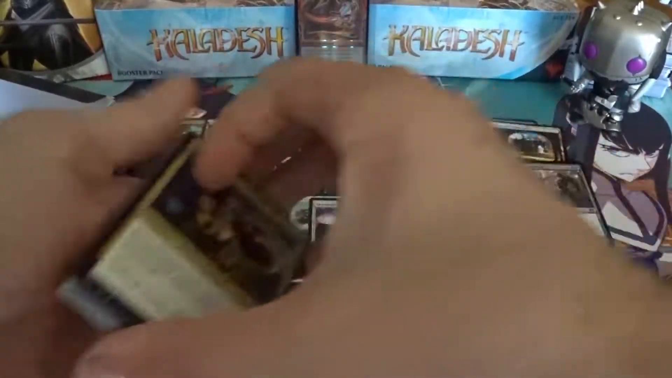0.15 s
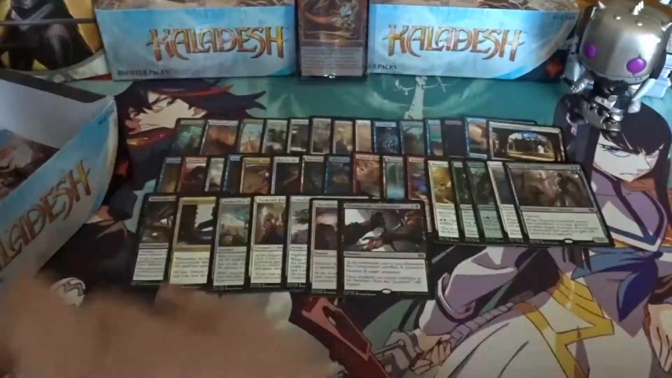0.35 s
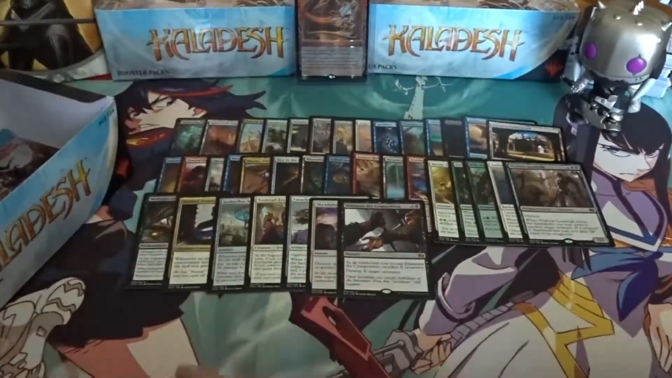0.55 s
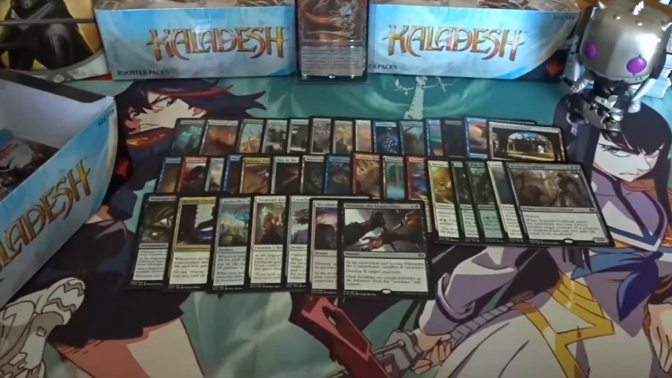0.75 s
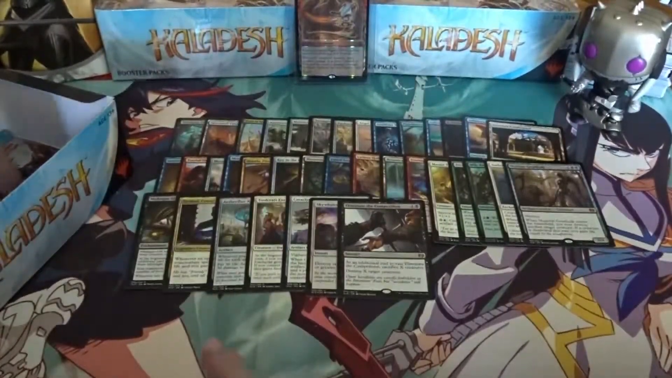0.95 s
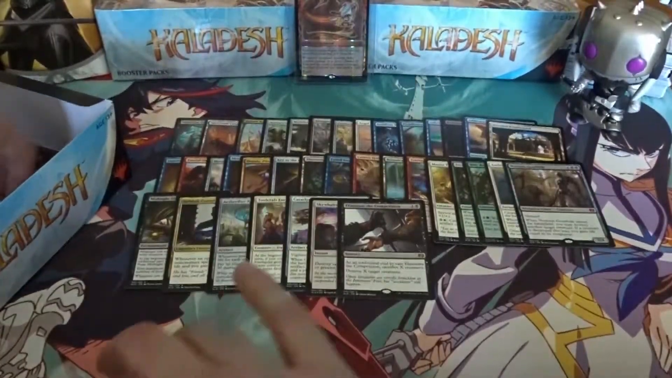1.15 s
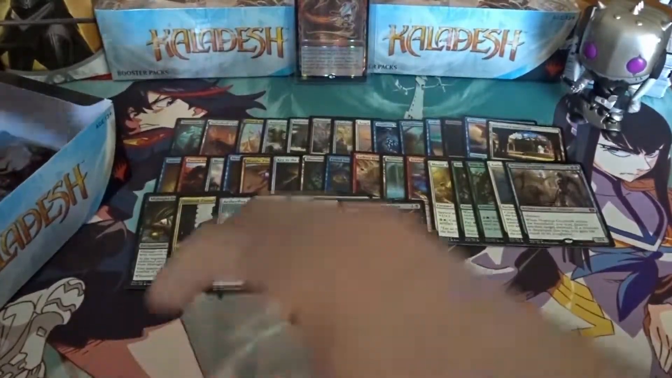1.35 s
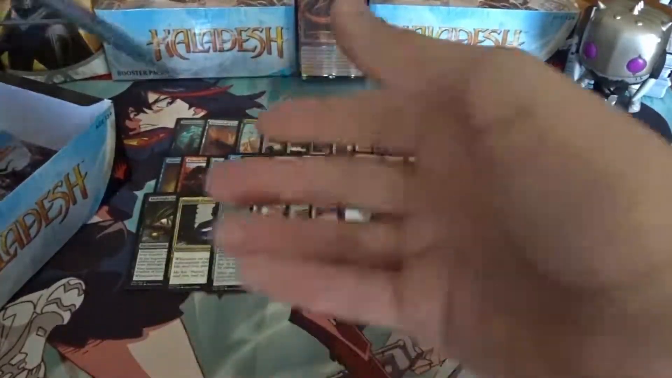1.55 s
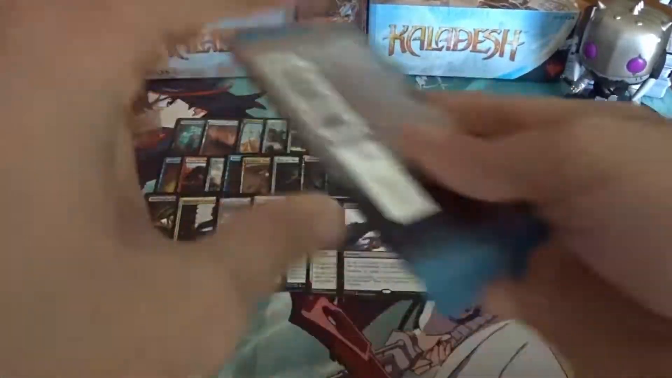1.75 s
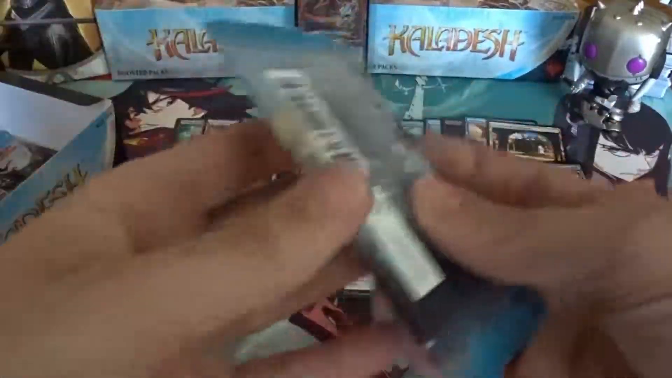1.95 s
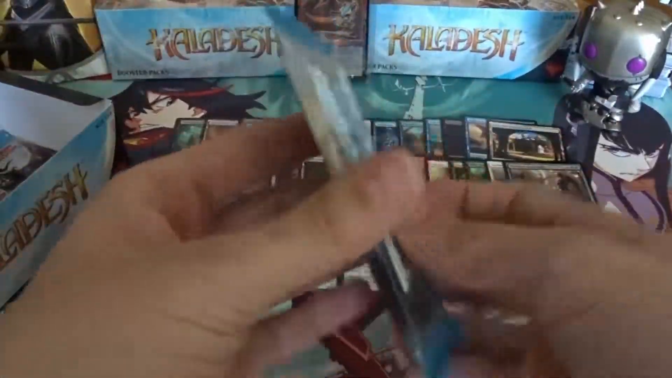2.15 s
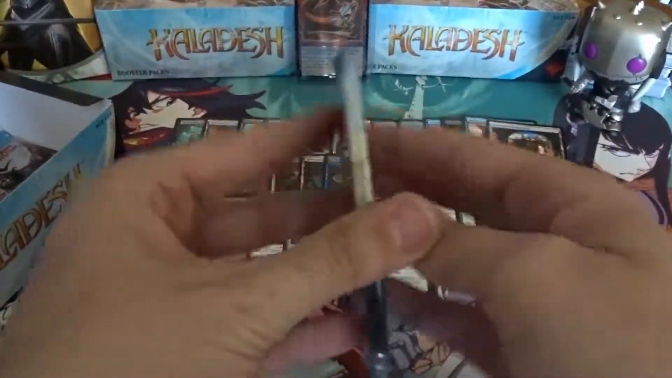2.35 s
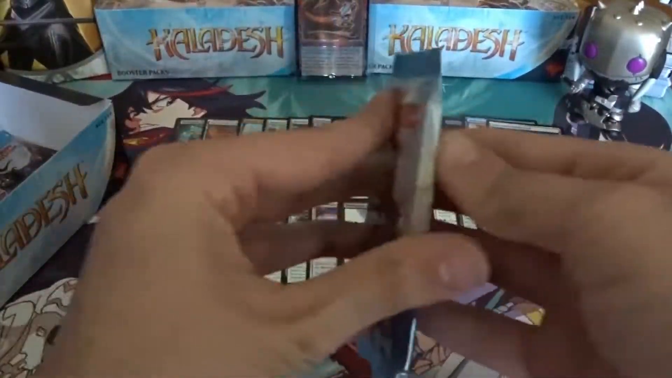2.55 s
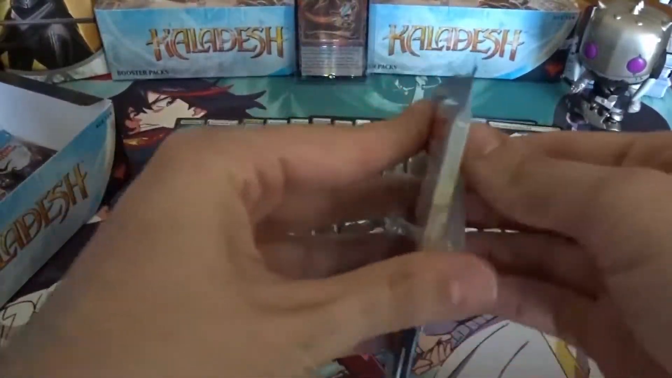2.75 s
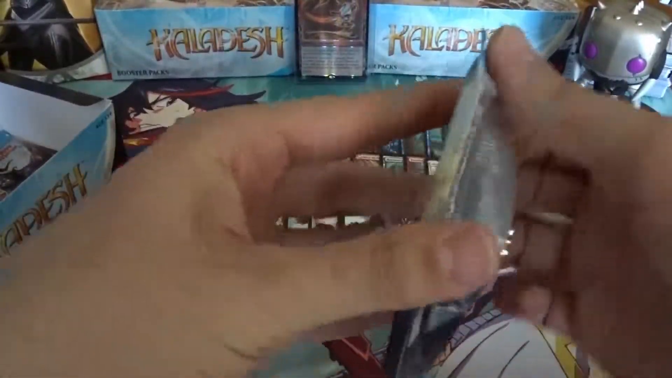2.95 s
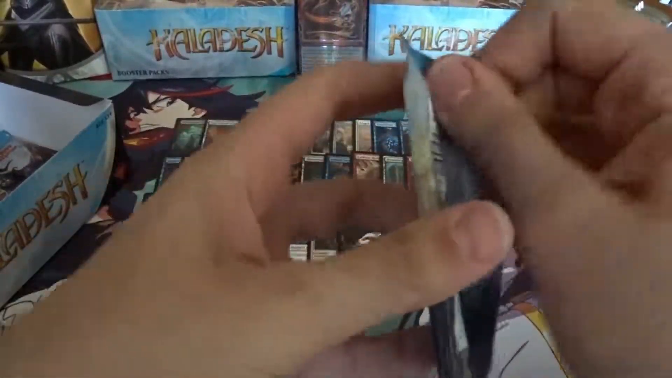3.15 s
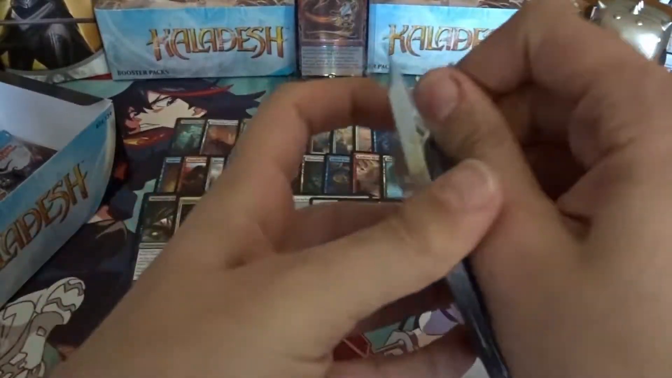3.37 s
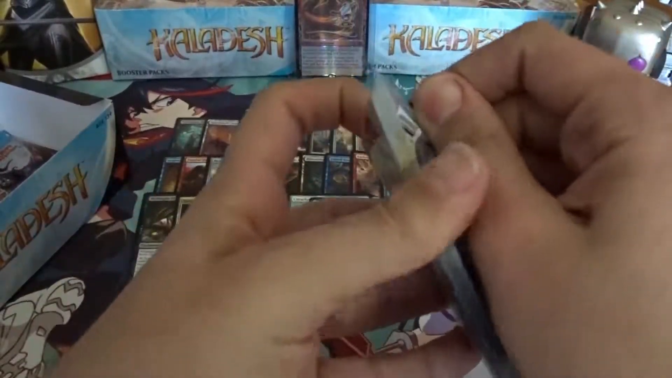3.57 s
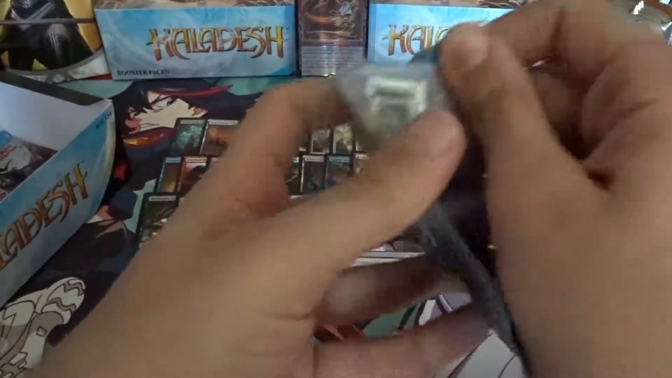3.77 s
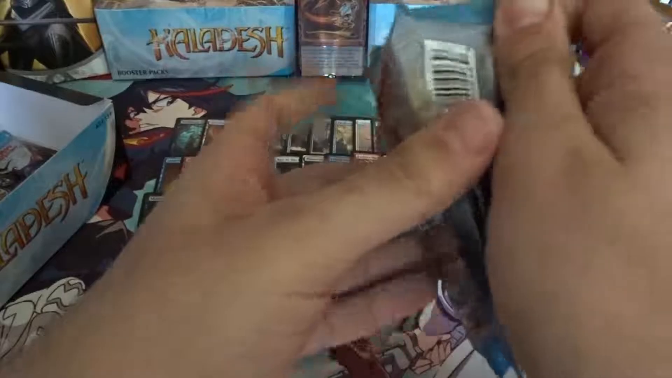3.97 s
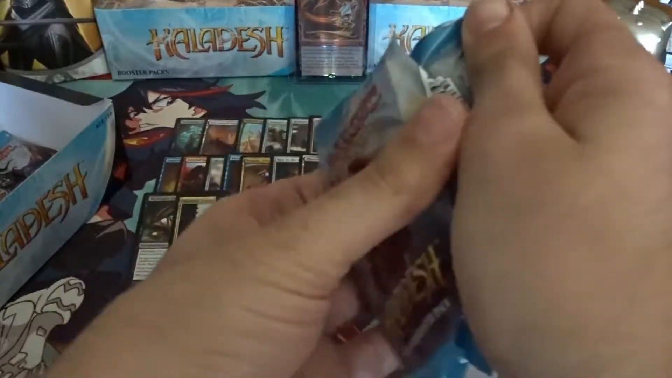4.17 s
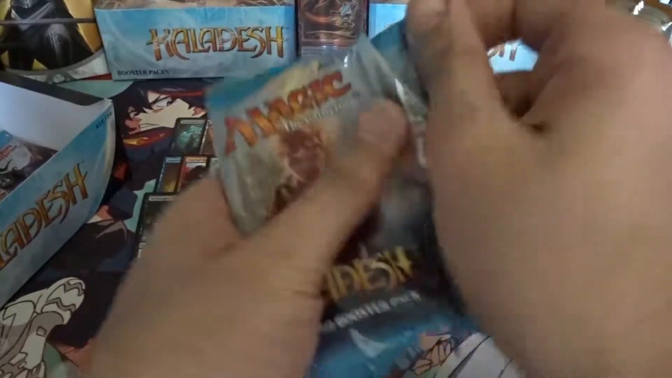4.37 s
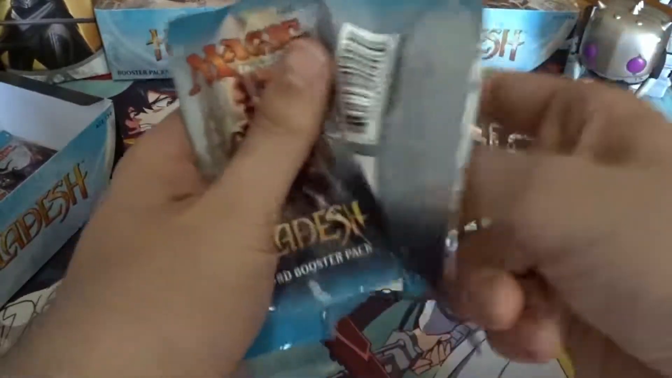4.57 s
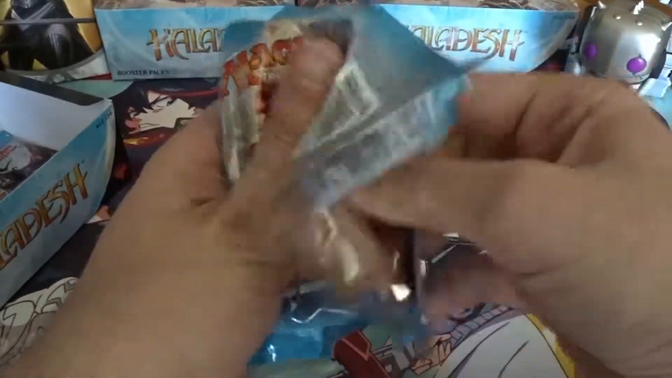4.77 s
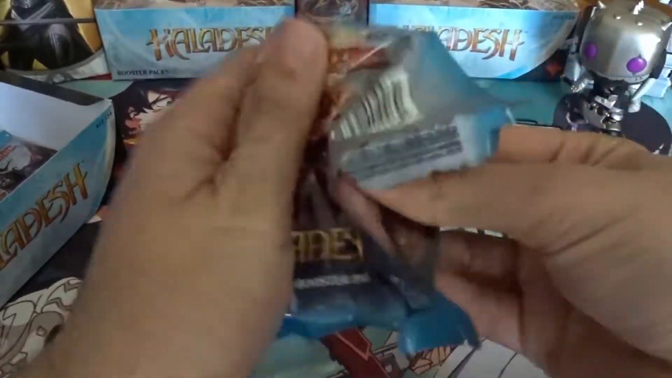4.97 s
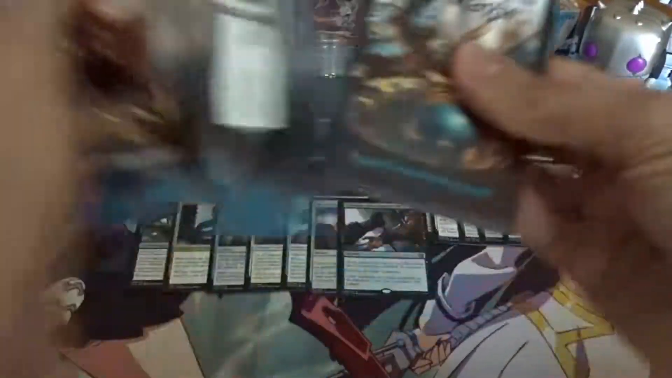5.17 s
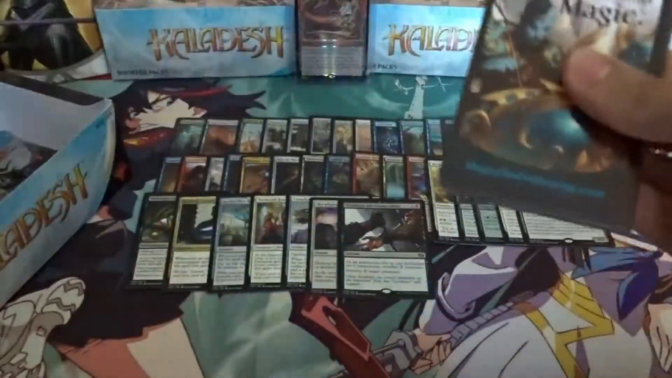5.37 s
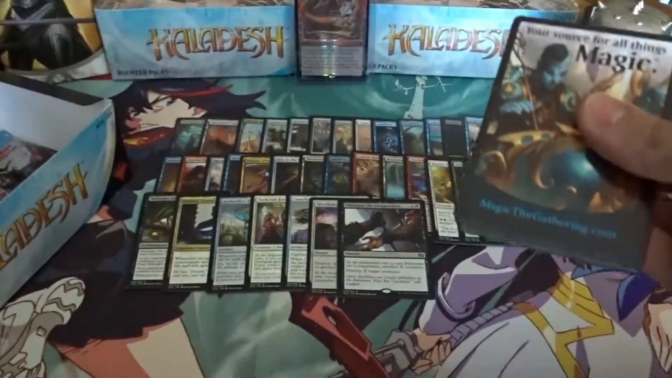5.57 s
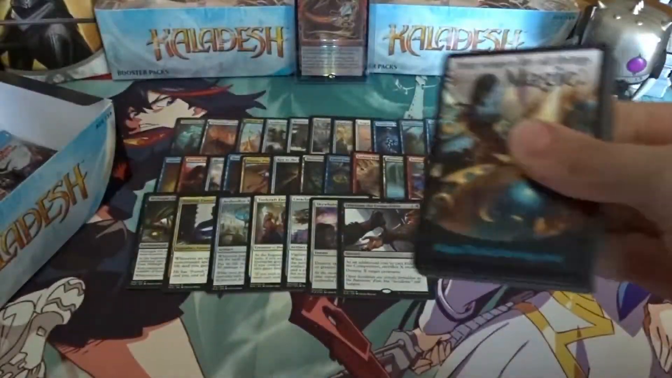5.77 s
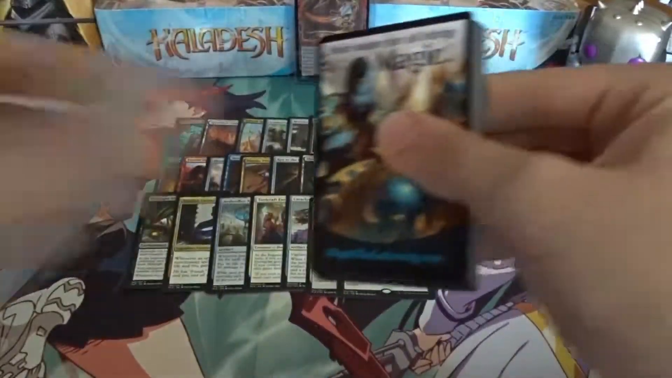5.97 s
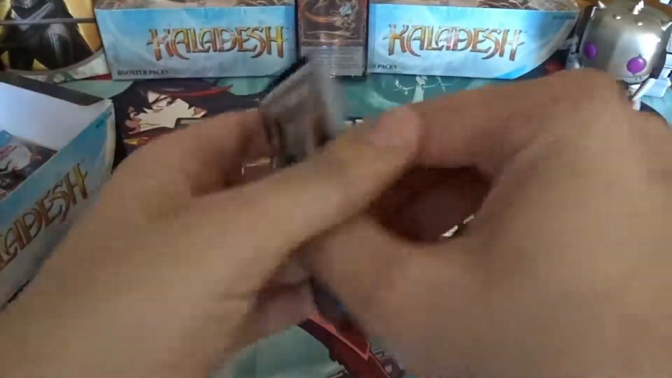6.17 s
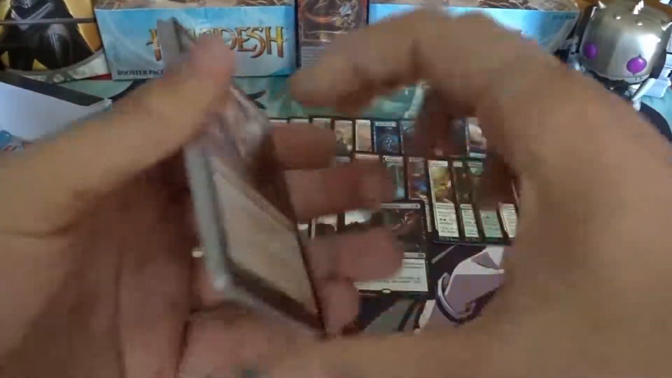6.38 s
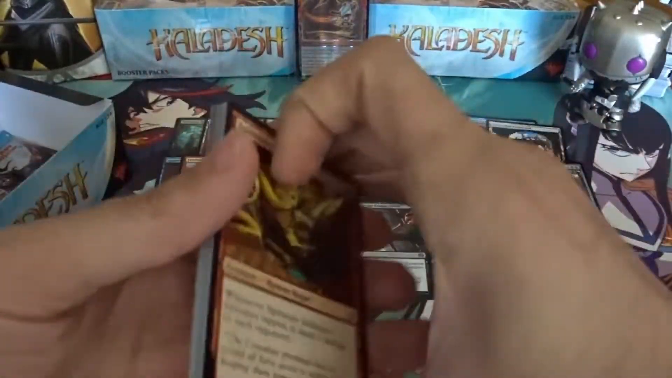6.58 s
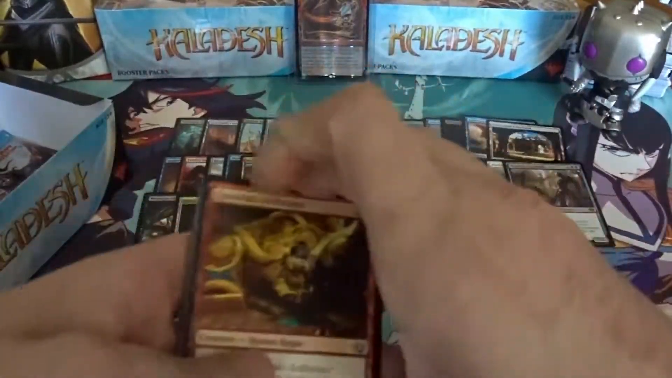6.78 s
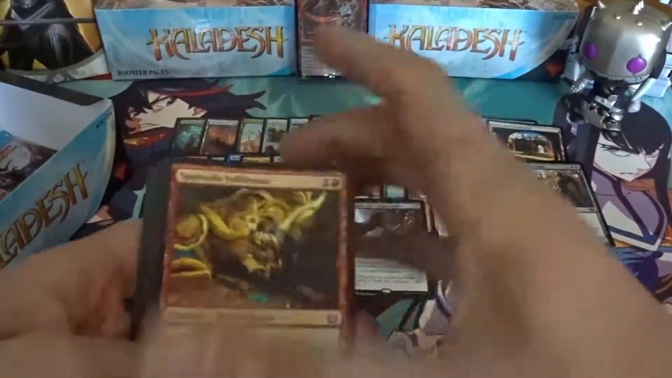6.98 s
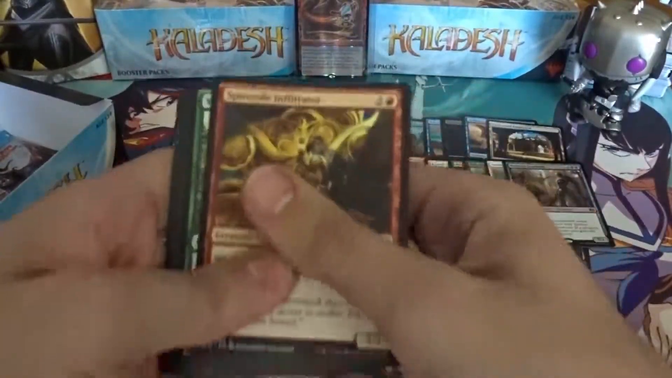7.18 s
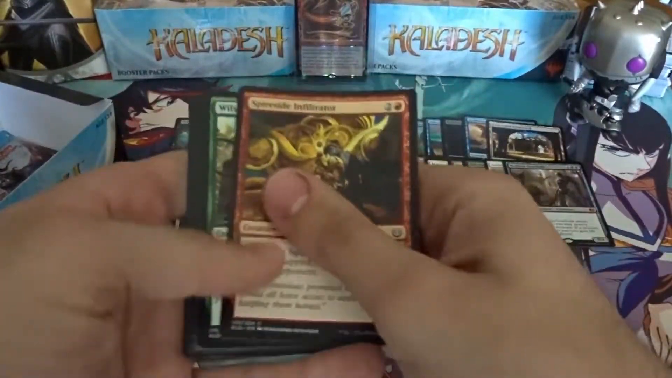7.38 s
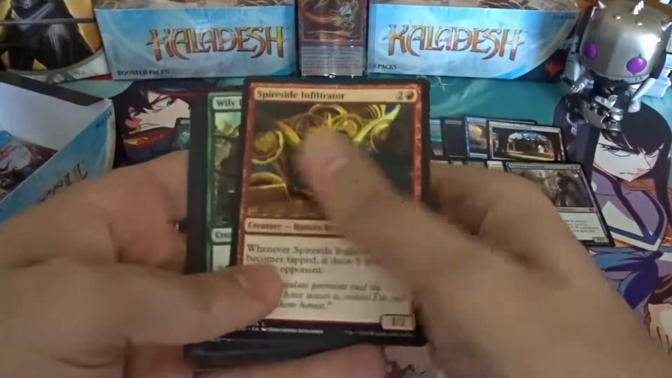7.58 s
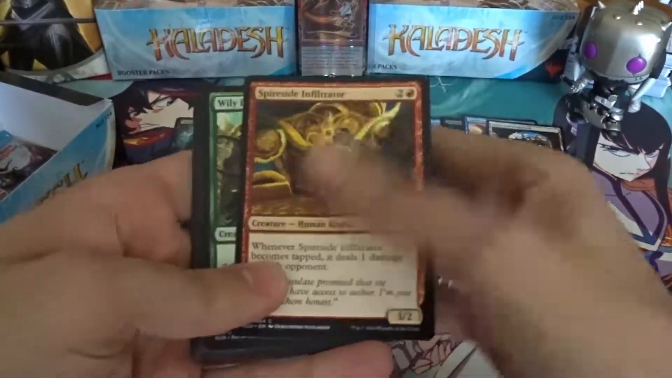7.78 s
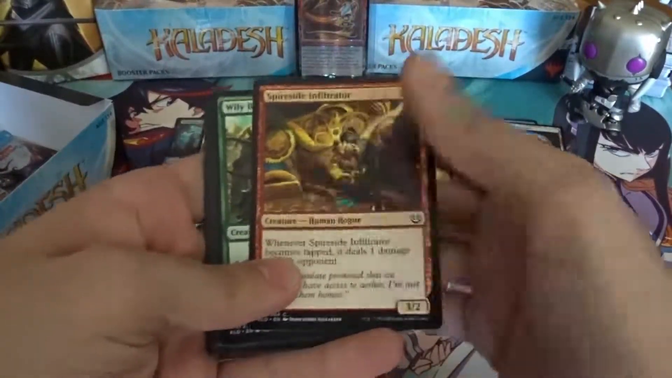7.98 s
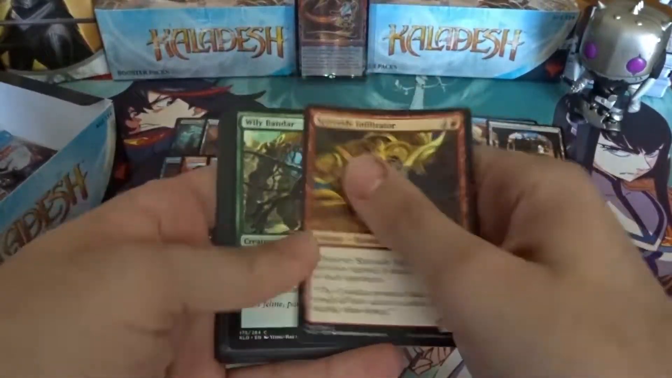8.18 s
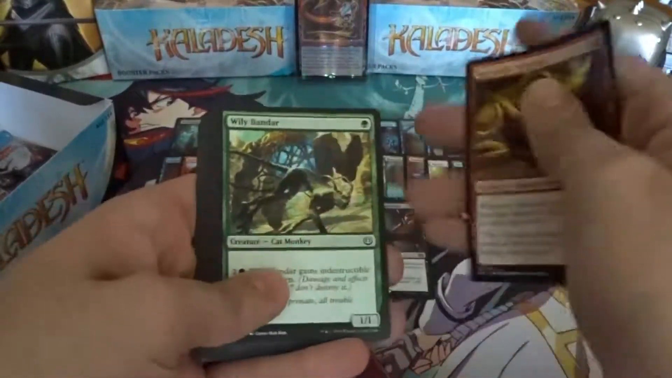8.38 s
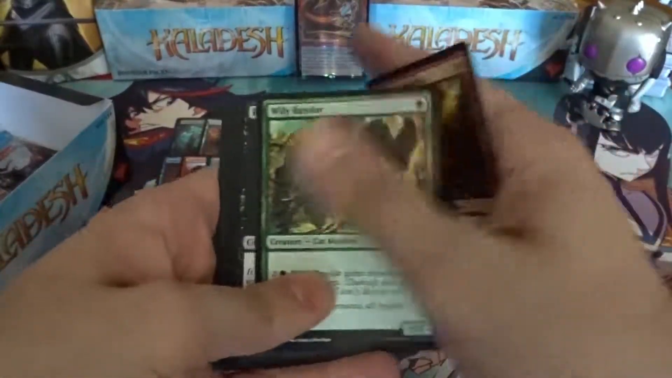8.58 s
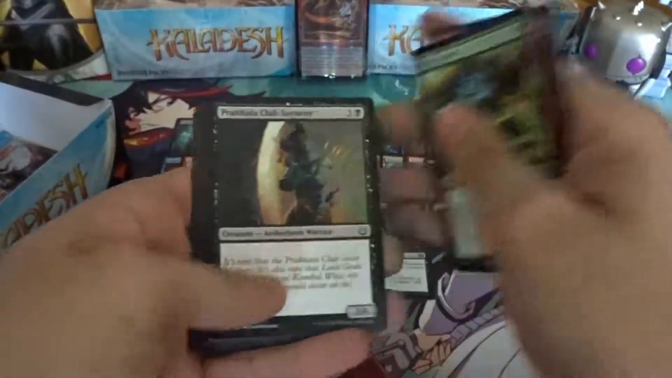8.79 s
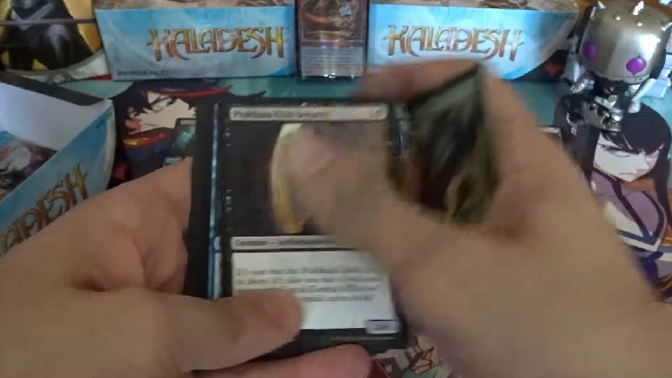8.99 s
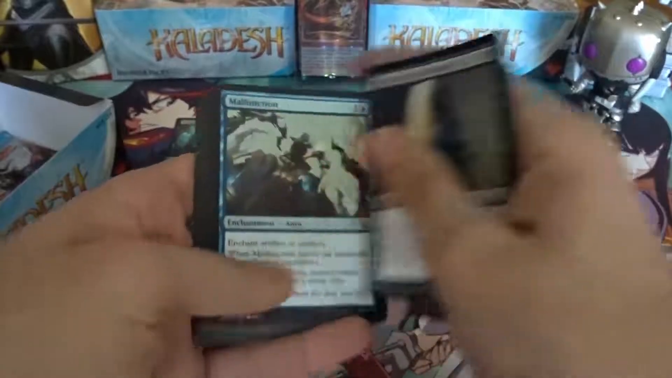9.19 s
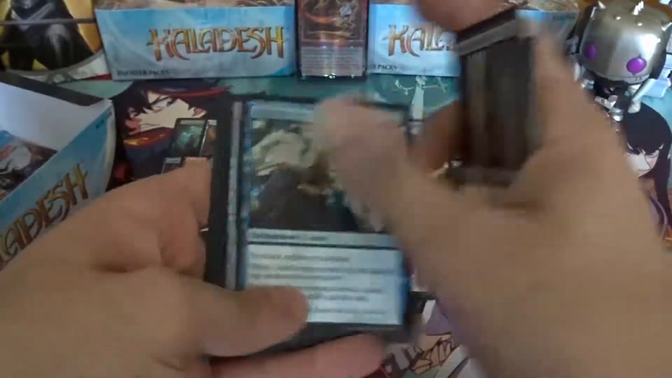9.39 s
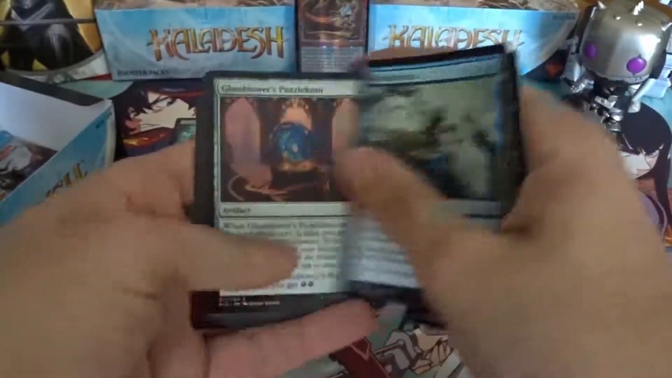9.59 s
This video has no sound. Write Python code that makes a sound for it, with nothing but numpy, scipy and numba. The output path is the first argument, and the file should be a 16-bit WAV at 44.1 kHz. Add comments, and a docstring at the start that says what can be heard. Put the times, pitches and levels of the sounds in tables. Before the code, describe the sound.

In a small quiet indoor room with a faint fan hum, hands first make tiny rustles and soft rubs. A foil packet slides briefly against a cardboard box, creases a little, then crackles loudly and densely as it is opened, with sticky seam clicks, taps on the cards and short squeaks. The crinkling stops abruptly and soft card rubs remain. Close phone microphone.

```python
"""A fan hums faintly behind hands that handle a foil-wrapped stack of cards, close to a phone in a small quiet room.
First come light rustles, creases and soft rubs; near 2 s the pack slides from a cardboard box that rings along.
From 4 s to 8 s the foil buckles in dense fits, modelled as noise and short ringing grains, with snapping creases,
a glued seam clicking open, a pouch of air resonating, knocks on the stack and, near 7 s, stick-slip squeaks.
Then the rustle thins out and fingers and cards rub softly to the end."""
import sys
import numpy as np
from scipy import signal
from scipy.fft import rfft, irfft
from scipy.io import wavfile
from scipy.ndimage import uniform_filter1d
from numba import njit

SR = 44100
rng = np.random.default_rng(int(sys.argv[2]) if len(sys.argv) > 2 else 0)


def makeup_ratio(level_db):
    """Linear amplitude ratio for a level in decibels (20 dB per factor of ten)."""
    decades = np.asarray(level_db, float) / 20
    return 10 ** decades


def bounce(signal):
    """Save signal as a 16-bit WAV file at the path given by the first command-line argument."""
    frames = np.transpose(np.atleast_2d(signal))
    limited = np.clip(frames, -1, 1)
    pcm = np.round(limited * 32767).astype(np.int16)
    wavfile.write(sys.argv[1], SR, pcm)


N = 425124

# hush of the air, spectral shape: (frequency [Hz], density [dB per Hz])
AIR_SPECTRUM = [(30, 2), (80, -11.5), (244, 2), (382, -5.5), (509, -3), (1150, -15), (1530, -15.5),
                (2150, -21), (4500, -22.5), (5200, -20), (5900, -25), (15800, -36)]
# steady tones of the fan: (frequency [Hz], rms level before wavering [dB])
FAN_TONES = [(258.4, -79.5), (516.8, -64.5), (1529, -75.5)]
# fits of the grip: (start [s], length [s], rustle level [dB], pitch of the taut foil [Hz])
GRIP_FITS = [(0.0, 0.024, -42, 5800), (0.038, 0.14, -51, 2920), (0.211, 0.036, -46, 5900),
             (0.277, 0.012, -42.5, 4940), (0.378, 0.006, -39.5, 5740), (2.062, 0.017, -48.5, 2900),
             (2.103, 0.043, -35.5, 7500), (2.196, 0.06, -38.5, 4020), (2.263, 0.048, -38, 2090),
             (2.345, 0.051, -36, 2060), (2.79, 0.022, -38, 9900), (2.875, 0.015, -40.5, 5500),
             (3.125, 0.13, -47.5, 6020), (3.263, 0.094, -38, 5600), (3.39, 0.098, -38.5, 2290),
             (3.538, 0.088, -35.5, 9100), (3.867, 0.18, -40.5, 5640), (3.953, 0.14, -23.5, 6800),
             (4.029, 0.03, -22, 5570), (4.109, 0.08, -19, 4440), (4.196, 0.076, -21.5, 7400),
             (4.295, 0.043, -21, 7900), (4.337, 0.006, -13, 6400), (4.339, 0.15, -22.5, 5100),
             (4.52, 0.15, -28, 2140), (4.711, 0.0027, -30.5, 1630), (4.845, 0.2, -40, 10500),
             (4.967, 0.073, -21, 4000), (5.109, 0.018, -18.5, 3730), (5.237, 0.071, -22.5, 5040),
             (5.287, 0.073, -22.5, 1690), (5.419, 0.055, -21.5, 4330), (5.56, 0.034, -21, 2520),
             (5.616, 0.11, -17, 3340), (5.809, 0.034, -24, 6500), (5.904, 0.11, -17.5, 5000),
             (6.09, 0.16, -26.5, 6800), (6.277, 0.034, -20.5, 4200), (6.359, 0.12, -28, 5670),
             (6.43, 0.11, -24, 6060), (6.563, 0.089, -27.5, 4550), (6.694, 0.008, -23, 4630),
             (6.747, 0.02, -26, 6000), (6.785, 0.061, -22, 5000), (6.901, 0.047, -29, 5500),
             (6.975, 0.089, -28, 4170), (7.109, 0.047, -25, 4150), (7.262, 0.14, -30, 2380),
             (7.339, 0.058, -26, 6700), (7.462, 0.036, -29.5, 4000), (7.503, 0.065, -26, 3600),
             (7.59, 0.12, -21, 3030), (7.69, 0.12, -21, 4300), (7.796, 0.061, -18, 3230),
             (7.884, 0.059, -41, 3050), (7.998, 0.014, -40.5, 4260), (8.068, 0.041, -38, 2600),
             (8.248, 0.094, -47, 1760), (8.351, 0.029, -45.5, 4580), (8.401, 0.024, -45.5, 2190),
             (8.523, 0.023, -43.5, 1990), (8.628, 0.032, -48.5, 4920)]
# hiss of the foil sheet, spectral shape: (frequency [Hz], density [dB per Hz])
FOIL_SPECTRUM = [(710, -23.5), (1200, -9), (1570, 0.5), (5260, 5), (12300, -2.5), (15800, -1.5)]
# crispness of the foil, low while it slides or tears smoothly: (time [s], small creases [dB])
CRACKLE = [(.5, -3), (2.3, -10), (3.2, -0.5), (4.0, 2), (4.15, -9), (4.33, -6), (4.5, 2.5), (4.9, -0.5),
           (5.3, 10.5), (5.551, 3), (5.7, 2), (6.1, 3), (6.9, 4), (7.5, 3), (7.9, -3)]
# how much the grip bears on the cards inside: (time [s], stack level above the rustle [dB])
BEARING = [(.3, -16), (2.1, -14), (2.4, -1), (3.2, -12.5), (3.6, -18), (3.999, -19.5), (4.6, -26.5),
           (4.949, -29), (5.15, -18.5), (5.65, -22), (5.95, -16), (6.5, -14), (7.001, -7.5), (7.3, 0),
           (7.5, -14), (7.85, -7.5), (8.3, -10), (9.6, 9)]
# bending modes of the stack of cards: (frequency [Hz], width [Hz], gain [dB])
STACK_MODES = [(169, 54, -13.5), (380, 180, -7.5), (942, 490, 3)]
# the clearest creases: (time [s], peak level [dB])
CREASE_SNAPS = [(0.0467, -26.5), (0.2016, -29.0), (0.3818, -27.5), (1.0792, -31.0), (2.441, -17.0),
                (2.7888, -19.0), (2.8078, -12.0), (2.8228, -12.0), (3.0981, -27.5), (3.1397, -27.0),
                (3.184, -22.5), (3.2678, -15.5), (3.2928, -13.5), (3.3114, -11.5), (3.3255, -8.5),
                (3.344, -11.0), (3.375, -8.5), (3.4134, -6.5), (3.4209, -3.0), (3.5595, -11.0),
                (3.5771, -8.5), (3.8644, -24.0), (3.9424, -18.5), (3.9568, -5.5), (3.9744, -5.5),
                (3.994, -1.5), (4.0072, -1.5), (4.0176, -3.5), (4.0225, -3.0), (4.0376, -2.5),
                (4.0604, -3.5), (4.0823, -2.5), (4.1432, -1.0), (4.2653, -2.0), (4.3177, -3.0),
                (4.3681, 0.5), (4.3773, -2.5), (4.408, 0.0), (4.4307, -5.5), (4.4383, -3.5), (4.4724, -5.5),
                (4.4902, 0.0), (4.5341, -5.5), (4.5754, -1.5), (4.6016, -7.0), (4.6107, -1.0),
                (4.6326, -4.5), (4.6537, -9.0), (4.7582, -11.0), (4.8225, -9.0), (4.8298, -13.0),
                (4.8404, -11.5), (4.8524, -7.0), (4.9342, -2.5), (5.0257, -3.5), (5.062, -4.5),
                (5.1181, -6.0), (5.1424, -3.0), (5.1478, -5.0), (5.2775, -3.5), (5.3015, 0.0),
                (5.3087, -2.5), (5.3242, -5.5), (5.3412, -3.5), (5.346, -4.0), (5.386, -1.0),
                (5.3957, -5.0), (5.4424, -3.5), (5.4552, -2.5), (5.469, -3.5), (5.5259, 1.0),
                (5.5667, -7.5), (5.5773, -7.0), (5.5911, -5.0), (5.6198, 0.5), (5.6604, -2.5),
                (5.7541, -4.0), (5.7763, -4.0), (5.807, -5.5), (5.8218, -3.0), (5.8722, -3.5),
                (5.8791, -3.0), (5.8935, -1.0), (6.0386, -6.0), (6.0741, -12.0), (6.0853, -10.5),
                (6.1005, -9.5), (6.1059, -6.5), (6.1282, -5.0), (6.1486, -3.5), (6.1658, -2.0),
                (6.2017, -1.5), (6.2235, -7.5), (6.3873, -3.5), (6.3971, -4.0), (6.4664, -2.5),
                (6.5231, -5.0), (6.5717, -4.0), (6.5984, -7.5), (6.6102, -1.5), (6.6272, -4.0),
                (6.6355, -4.5), (6.6477, -4.0), (6.6638, -2.5), (6.7034, -2.0), (6.7508, -8.5),
                (6.8292, -2.0), (6.8462, -5.0), (6.9266, -6.0), (6.9414, -1.5), (6.9557, -2.5),
                (6.9929, -2.0), (7.0066, 0.0), (7.0233, -2.5), (7.1108, -2.0), (7.2404, -10.0),
                (7.2548, -9.5), (7.2631, -7.5), (7.3539, -4.0), (7.3742, -1.5), (7.4139, -7.5),
                (7.4238, -5.5), (7.4649, -3.5), (7.4811, -5.0), (7.486, -5.0), (7.5116, -8.5),
                (7.5236, -3.0), (7.5331, -2.0), (7.5534, -2.5), (7.5646, -2.5), (7.5777, -3.5),
                (7.5949, -7.0), (7.6317, -3.5), (7.6491, -4.5), (7.6701, -3.0), (7.6806, -3.0),
                (7.6881, -2.5), (7.6951, -2.5), (7.7171, -3.5), (7.7413, -2.0), (7.7644, -5.0),
                (7.7877, -4.5), (7.8364, -2.0), (7.9402, -12.0), (7.9561, -11.5), (8.0972, -21.0),
                (8.2704, -29.5), (8.3605, -26.0), (8.3685, -30.0), (8.4067, -24.5), (8.4146, -30.0),
                (8.5256, -26.0), (8.5335, -22.0), (9.1305, -43.0), (9.1603, -40.5), (9.1785, -34.5),
                (9.3331, -34.5), (9.4911, -35.5)]
# fingertip knocks on the stack: (time [s], peak level [dB], contact [ms])
STACK_KNOCKS = [(0.395, -30, 0.46), (1.08, -30, 0.017), (2.128, -27, 0.16), (2.268, -37, 0.26),
                (2.275, -23.5, 0.19), (2.293, -23, 0.2), (2.298, -17, 0.28), (2.39, -31, 0.11),
                (2.442, -23.5, 0.67), (2.7888, -15, 0.77), (2.814, -19.5, 0.93), (3.3461, -16.5, 0.062),
                (4.437, -4.5, 0.017), (4.93, -13.5, 0.015), (6.4712, -12.5, 0.087), (6.5231, -4.5, 0.3),
                (6.701, -13, 0.1), (7.263, -14, 0.082), (7.3748, -9.5, 0.12), (7.419, -26, 0.79),
                (7.648, -13, 0.14), (7.7176, -13, 0.21), (7.854, -11, 0.41), (7.8653, -8.5, 0.62),
                (8.0841, -18.5, 0.9), (8.261, -33, 0.41)]
# soft rubs of skin and card faces: (middle [s], length [s], level [dB], brightest frequency [Hz])
SOFT_RUBS = [(0.57, 0.087, -59, 4900), (1.139, 0.04, -52, 4170), (1.336, 0.3, -57.5, 1800),
             (1.935, 0.83, -61, 2000), (8.207, 0.11, -56, 4440), (8.653, 0.45, -55, 2970),
             (9.217, 0.25, -53.5, 5200), (9.368, 0.045, -49.5, 4600), (9.601, 0.19, -46.5, 6800)]
# the heel of a hand bumps the table: (time [s], peak level [dB], frequency [Hz])
TABLE_THUDS = [(2.1, -39, 185), (2.267, -44, 175), (6.516, -37, 153), (7.4, -38, 96), (7.856, -27, 128),
               (8.077, -43, 149), (8.258, -36.5, 229)]
# resonances of the cardboard box: (frequency [Hz], width [Hz], gain [dB])
BOX_MODES = [(885, 104, 9.5), (300, 89, 1), (4000, 4000, 2.5)]
# runs of clicks from the glued seam:
# (start [s], length [s], first rate [Hz], last rate [Hz], typical click peak before the high-pass [dB])
SEAM_PEELS = [(3.728, 0.037, 910, 2420, -26.5), (3.771, 0.031, 2270, 1180, -22.5),
              (3.839, 0.0053, 695, 900, -22), (4.542, 0.022, 446, 590, -11.5),
              (4.851, 0.06, 2666, 333.5, -15.5), (4.896, 0.11, 331, 259, -11),
              (5.185, 0.038, 610, 300, -13.5), (5.24, 0.035, 380, 245, -31), (5.63, .12, 170, 150, -6),
              (5.918, .1, 170, 160, -5), (6.351, 0.038, 244, 300, -10.5), (6.782, 0.036, 388, 700, -18)]
# air in the opened wrapper rings while its mouth faces the phone: (time [s], level above the rustle [dB])
POUCH_LEVEL = [(4.2, -46), (4.6, -19.5), (4.851, -24), (5.099, -5), (5.351, -9), (5.6, -18.5), (6.1, -11),
               (6.4, -16)]
# skin sticking and slipping on the film:
# (start [s], length [s], first slip rate [Hz], last slip rate [Hz], rms level before the swell [dB])
FILM_SQUEAKS = [(7.04, 0.022, 880, 849, -19), (7.055, 0.048, 1450, 1130, -15.5),
                (7.124, 0.025, 1060, 860, -17), (7.298, 0.018, 1077, 1087, -26)]
# resonances of the stretched film: (frequency [Hz], width [Hz], gain [dB])
FILM_MODES = [(1050, 400, 3), (3400, 2200, 2), (7500, 3000, -8)]

AIR_DB, FAN_WAVER_DB = -53, 2.2
ROOM_T60_S, ROOM_DB = 0.36, -18
RISE_DB, RISE_SHARE = 3, 0.32  # a fit swells in over this share of its length
# it fades a little while it holds, drops when the grip eases, then settles on more quietly
FADE_DB_PER_S, DROP_DB_PER_S, SETTLE_DB, SETTLE_DB_PER_S = 5.5, 392, -10.5, 86
STACK_LINGERS = 0.036  # share of the rustle's drop after a fit that the stack does not follow
SNAP_SCATTER_DB = 2.0  # spread of a crease's pitch ratio to the taut foil, as 20 log10
THUD_CYCLES = 1.17
BOX_START_S, BOX_END_S, BOX_DB = 2.1, 2.47, 6
PEEL_CLICK_S, PEEL_STUMBLE_HZ = .00015, 90
POUCH_HZ, POUCH_WIDTH_HZ = 1550, 170
SQUEAK_HISS_DB, SQUEAK_SWELL = -8, .55  # hiss relative to the tone; exponent below 1 peaks early


def level(x, db):
    """Root-mean-square scaling: set a signal's rms level."""
    return x * makeup_ratio(db) / np.sqrt(np.mean(x ** 2))


def colour(x, points):
    """Spectral shaping: weight a long noise by (frequency [Hz], gain [dB]) points."""
    hz, db = np.transpose(points)
    f = np.fft.rfftfreq(len(x), 1 / SR) + 1
    return irfft(rfft(x) * makeup_ratio(np.interp(np.log(f), np.log(hz), db)), len(x))


def band(x, edges_hz, kind):
    """Gentle filtering by a second-order Butterworth prototype."""
    return signal.sosfilt(signal.butter(2, edges_hz, kind, fs=SR, output="sos"), x)


def resonance(f, hz, width):
    """Damped oscillator: response of one mode, gain 1 at its centre."""
    return 1 / (1 + 1j * (f ** 2 - hz ** 2) / (f * width))


def ring_modes(x, modes):
    """Modal superposition: a body answers as the sum of its damped modes."""
    f = np.fft.rfftfreq(x.shape[-1], 1 / SR) + 1
    response = sum(makeup_ratio(db) * resonance(f, hz, width) for hz, width, db in modes)
    return irfft(rfft(x) * response, x.shape[-1])


def follow(points):
    """Linear interpolation of (time [s], level [dB]) points to every sample."""
    return np.interp(np.arange(N) / SR, *np.transpose(points))


def walk(rate):
    """Slow random modulation: levels held 1 / rate s and smoothed twice, spread near 1."""
    k = int(SR / rate)
    held = np.repeat(rng.standard_normal(N // k + 1), k)
    return 1.267 * uniform_filter1d(uniform_filter1d(held, k), k)[:N]


def place(s, peak_db, sounds):
    """Superposition: lay short sounds at their moments, each at its peak level."""
    out = np.zeros(N + sounds.shape[1])
    for start, db, sound in zip((s * SR).astype(int), peak_db, sounds):
        out[start:start + len(sound)] += makeup_ratio(db) * sound / np.abs(sound).max()
    return out[:N]


def room_tone():
    """Broadband air noise that swells a little, with the wavering pure tones of a fan."""
    air = level(colour(rng.standard_normal(N), AIR_SPECTRUM), AIR_DB) * makeup_ratio(0.38 * walk(5.8))
    fan = np.zeros(N)
    for hz, db in FAN_TONES:
        loudness = np.sqrt(2) * makeup_ratio(db + FAN_WAVER_DB * walk(11))
        turns = hz * np.cumsum(1 + 0.00363 * walk(4.9)) / SR
        fan += loudness * np.sin(2 * np.pi * turns)
    return air + fan


def room(x):
    """Reverberation: table top and near walls return a short, duller, exponentially decaying tail."""
    t = np.arange(int(.4 * SR)) / SR
    tail = rng.standard_normal(len(t)) * np.exp(-np.log(1000) * t / ROOM_T60_S) * (t > .002)
    tail = signal.lfilter([1], [1, -.4], tail)
    return x + makeup_ratio(ROOM_DB) * signal.fftconvolve(x, tail / np.sqrt(np.sum(tail ** 2)))[:N]


def grip():
    """Masking by the strongest fit: rustle level, its fall within that fit, and that fit's pitch."""
    grip_db, fallen_db, taut_hz = np.full(N, -90.), np.zeros(N), np.zeros(N)
    for start, length, db, hz in GRIP_FITS:
        i = np.arange(int(max(start, 0) * SR), min(N, int((start + 1) * SR)))
        since = i / SR - start
        after = np.maximum(since - length, 0)
        rise = RISE_DB * np.maximum(1 - since / (RISE_SHARE * length), 0)
        release = np.minimum(DROP_DB_PER_S * after, SETTLE_DB_PER_S * after - SETTLE_DB)
        fall = rise + FADE_DB_PER_S * since + release
        leads = db - fall > grip_db[i]
        grip_db[i[leads]] = (db - fall)[leads]
        fallen_db[i[leads]] = fall[leads]
        taut_hz[i[leads]] = hz
    return grip_db, fallen_db, np.maximum(taut_hz, 1500)


def jerks():
    """Stick-slip of the foil: small jerks set in sharply and relax exponentially."""
    slips = (rng.random(N) < 200 / SR) * rng.random(N)  # about 200 a second
    relaxing = signal.lfilter([1], [1, -np.exp(-1 / (.005 * SR))], slips)
    return (.7 + relaxing) * makeup_ratio(1.0 * walk(120))


@njit
def grains(start, hz, cycles, size, n, sr):
    """Free decay: each grain is a patch of foil ringing for a few cycles."""
    out = np.zeros(n)
    for k in range(len(start)):
        p = np.exp(2j * np.pi * hz[k] / sr - hz[k] / (cycles[k] * sr))
        z = size[k] + 0j
        for i in range(start[k], min(n, start[k] + int(6 * cycles[k] * sr / hz[k]))):
            out[i] += z.imag
            z *= p
    return out


def buckles(centre_hz, octaves, cycles, spread_db, count):
    """Random buckling: tiny rings at random moments, scattered round a centre pitch, some louder than the rest."""
    when, pitch, ring, size = rng.random((count, 4)).T
    start = (when * N).astype(np.int64)
    scatter = octaves * np.log(pitch / (1 - pitch)) / 2  # logistic spread
    hz = np.clip(centre_hz[start] * 2 ** scatter, 100, .4 * SR)
    size = makeup_ratio(-spread_db * np.log(size + 0.021)) * np.sqrt(hz)
    return level(grains(start, hz, cycles * (.5 + ring), size, N, 1. * SR), 0)


def creases(s, peak_db, hz, lasts_s=0.00074):
    """Snap-through: a very short burst of crackle with a faint afterrustle rings at two pitches."""
    t = np.arange(1024) / SR
    f = np.fft.rfftfreq(len(t), 1 / SR) + 1
    noise = rng.standard_normal((len(s), len(t) + 2))
    lasts = lasts_s * makeup_ratio(3.0 * noise[:, -1:])
    other_hz = np.clip(5000 * makeup_ratio(5.9 * noise[:, -2:-1]), 1500, .25 * SR)
    burst = noise[:, :-2] * (np.exp(-t / lasts) + makeup_ratio(-26.0) * np.exp(-t / 0.009))
    ring = resonance(f, hz[:, None], 0.22 * hz[:, None])
    ring = ring + makeup_ratio(-2.0) * resonance(f, other_hz, 0.19 * other_hz)
    ring = ring + makeup_ratio(-8.5) * resonance(f, 5540, 4100)  # broad brightness common to all
    return place(s, peak_db, irfft(rfft(burst) * ring, len(t)))


def stack(x):
    """Bending modes: the stack of cards rings dully."""
    return ring_modes(x, STACK_MODES)


def rustle():
    """Dense buckling of a thin sheet: hiss, grains at the taut pitch, small creases and the stack shifting."""
    grip_db, fallen_db, taut_hz = grip()
    body_db = follow(BEARING) + STACK_LINGERS * fallen_db
    crackle_db = follow(CRACKLE)
    sheet = level(colour(rng.standard_normal(N), FOIL_SPECTRUM), 0)
    taut = buckles(taut_hz, octaves=0.19, cycles=3.1, spread_db=6.5, count=12000)
    pushes = buckles(np.full(N, 600.), octaves=0.72, cycles=0.71, spread_db=5.5, count=8000)
    when, size, pitch = rng.random((3000, 3)).T
    small = creases(when * (N / SR), 5.0 + 10.0 * size ** 3, 1500 * 2 ** (2.8 * pitch), lasts_s=.0004)
    # all folds share the hand's jerks and add their own; the tauter the foil, the fewer wide folds sound
    tautness = uniform_filter1d(np.log2(taut_hz / 4000), 200)  # octaves
    wide = makeup_ratio(-2.0 * tautness) * np.sqrt(jerks()) * band(sheet, [700, 2800], "band")
    narrow = np.sqrt(jerks()) * band(sheet, 1820, "high")
    ringing = makeup_ratio(-3.5 + 2.0 * tautness - 0.13 * crackle_db) * taut
    hand = jerks() ** np.clip(1.5 + crackle_db / 10, .2, 1)  # a smooth tear jerks less
    foil = level(hand * (wide + narrow + ringing), 0)
    foil = makeup_ratio(-crackle_db / 2) * foil + makeup_ratio(crackle_db / 2) * small
    # a light touch excites less of the treble
    dull = band(foil, 6500, "low")
    foil = dull + makeup_ratio(0.079 * (grip_db + 7.5) + 0.81 * tautness) * (foil - dull)
    sliding = hand * makeup_ratio(8.2 * walk(39.79) - 1.0) * rng.standard_normal(N)
    body = makeup_ratio(body_db) * level(hand * stack(pushes), 0)
    return makeup_ratio(grip_db) * (band(foil, 660, "high") + pouch(foil) + box(sliding) + body)


def snaps():
    """Tension sets pitch: each clear crease pops near the pitch the foil is stretched to."""
    s, peak_db = np.transpose(CREASE_SNAPS)
    taut_hz = grip()[2][(s * SR).astype(int)]
    hz = taut_hz * makeup_ratio(SNAP_SCATTER_DB * rng.standard_normal(len(s)))
    return creases(s, peak_db, np.clip(hz, 2300, .27 * SR))


def knocks():
    """Impact excitation: a fingertip pushes the stack; a longer contact sounds lower."""
    s, peak_db, contact_ms = np.transpose(STACK_KNOCKS)
    t_ms = np.arange(4096) * 1000 / SR
    rough = 1 + 1.02 * rng.standard_normal((len(s), len(t_ms)))
    push = rough * t_ms * np.exp(-t_ms / contact_ms[:, None])
    return place(s, peak_db, stack(push))


def rubs():
    """Sliding friction: fine grain under a finger swells and fades round a broad brightness."""
    out = np.zeros(2 * N)  # room for a rub that outlasts the scene
    grain = np.tile(rng.standard_normal(N) * makeup_ratio(2.8 * walk(90)), 2)
    for middle, length, db, hz in SOFT_RUBS:
        i = np.arange(int((middle - length / 2) * SR), int((middle + length / 2) * SR))
        f = np.fft.rfftfreq(len(i), 1 / SR) + 1
        tint = resonance(f, hz, .5 * hz) + makeup_ratio(-27) * resonance(f, 4000, 16000)
        rub = irfft(rfft(grain[i]) * tint, len(i))
        out[i] += np.hanning(len(i)) * level(rub, db)
    return out[:N]


def thuds():
    """Heavily damped oscillation: a soft bump swells and dies within a few low cycles."""
    s, peak_db, hz = np.transpose(TABLE_THUDS)
    cycles = np.arange(4096) / SR * hz[:, None]
    return place(s, peak_db, cycles * np.exp(-2 * cycles / THUD_CYCLES) * np.sin(2 * np.pi * cycles))


def box(x):
    """Forced vibration: while the pack slides along the box wall, the box adds its own few resonances."""
    t = np.arange(N) / SR
    return (t > BOX_START_S) * (t < BOX_END_S) * makeup_ratio(BOX_DB) * ring_modes(x, BOX_MODES)


def peels():
    """Adhesive release: short bright ticks; slow runs stumble, fast runs fuse into a thin rough squeak."""
    when, peak_db = [], []
    chance = rng.standard_normal((len(SEAM_PEELS), 128, 2))
    for (start, length, first_hz, last_hz, db), draws in zip(SEAM_PEELS, chance):
        s = 0.
        for late, size in draws:
            if s < length:
                when.append(start + s)
                peak_db.append(db + 2.0 * size)
            rate = first_hz * (last_hz / first_hz) ** min(s / length, 1)
            s += np.exp(min(PEEL_STUMBLE_HZ / rate, .3) * late) / rate
    t = np.arange(128) / SR
    f = np.fft.rfftfreq(len(t), 1 / SR) + 1
    rough = 1 + .2 * rng.standard_normal((len(when), len(t)))
    tick = rough * np.exp(-t / PEEL_CLICK_S) * np.cos(2 * np.pi * 9500 * t)
    film = resonance(f, 8200, 6700) + makeup_ratio(17.0) * resonance(f, 3800, 2200)
    clicks = place(np.array(when), peak_db, irfft(rfft(tick) * film, len(t)))
    return band(clicks, 2700, "high")


def pouch(x):
    """Cavity resonance: the air inside the wrapper rings at one pitch."""
    ring = ring_modes(x, [(POUCH_HZ, POUCH_WIDTH_HZ, 0)])
    return makeup_ratio(follow(POUCH_LEVEL)) * level(ring, 0)


def squeaks():
    """Stick-slip oscillation: rapid slips fuse into a wavering pitch, coloured by the stretched film."""
    out = np.zeros(N)
    chance, waver, patchy = rng.standard_normal(N), walk(180), makeup_ratio(2.0 * walk(300))
    for start, length, first_hz, last_hz, db in FILM_SQUEAKS:
        i = np.arange(int(start * SR), int((start + length) * SR))
        share = np.linspace(0, 1, len(i))
        rate = last_hz + (first_hz - last_hz) * (1 - share) ** 2  # glides fastest at first
        wobble = 1 + 0.32 * uniform_filter1d(chance[i], 30) + .018 * waver[i]
        phase = 2 * np.pi * np.cumsum(rate * wobble) / SR
        slips = np.zeros(len(i))
        for hz, width, gain_db in FILM_MODES:
            for k in range(1, 8):  # harmonics of the slip rate
                slips += np.real(np.exp(1j * k * phase) * resonance(k * rate, hz, width)) * makeup_ratio(gain_db)
        hiss = level(np.diff(chance[i], prepend=0), SQUEAK_HISS_DB)
        swell = np.sin(np.pi * share ** SQUEAK_SWELL) * patchy[i]
        out[i] += swell * level(level(slips, 0) + hiss, db)
    return out


def scene():
    """Radiation: hands send little bass through the air, the table carries its bumps; hush lies under them."""
    bumps = knocks()
    hands = rustle() + snaps() + bumps + box(bumps) + peels() + squeaks() + rubs()
    return (room(band(hands, 160, "high") + thuds()) + room_tone())[None]


def roll_off(x):
    """The treble ends steeply here."""
    return signal.sosfilt(signal.butter(12, 17010, fs=SR, output="sos"), x)


def record(dry):
    """Saturation and band limits: the phone rounds off the loudest snaps and cuts the lowest bass and the top."""
    rounded = band(np.tanh(dry), 70, "high")
    low_pass = signal.ellip(8, .2, 60, 15800, fs=SR, output="sos")  # ripple and stop-band depth in dB, edge in Hz
    mix = signal.sosfilt(low_pass, rounded)
    return roll_off(mix)


dry = scene()
out = record(dry)
bounce(out)
```